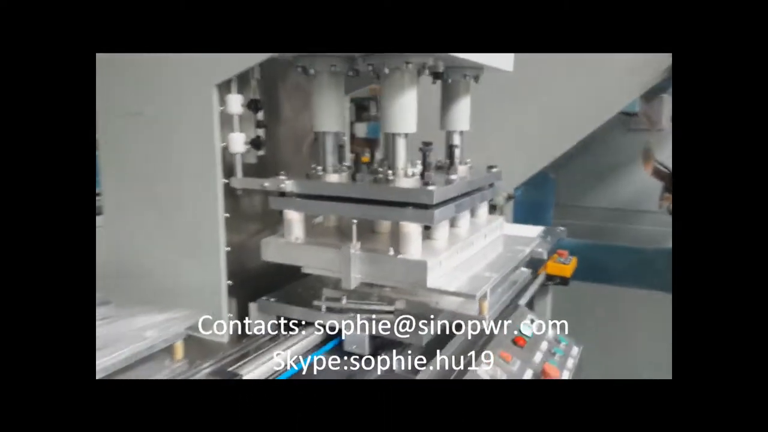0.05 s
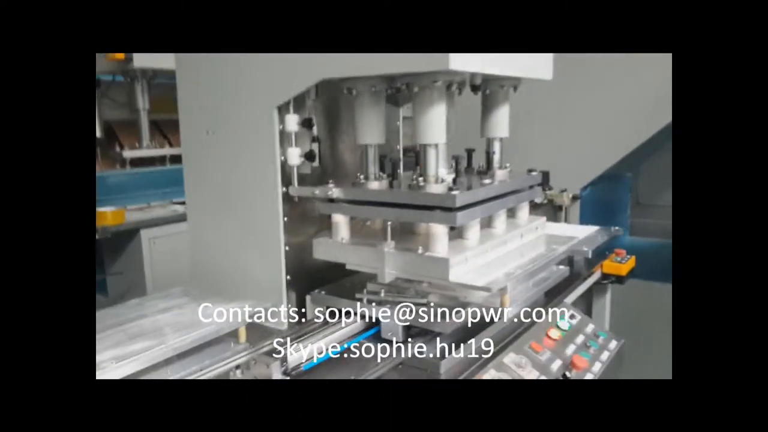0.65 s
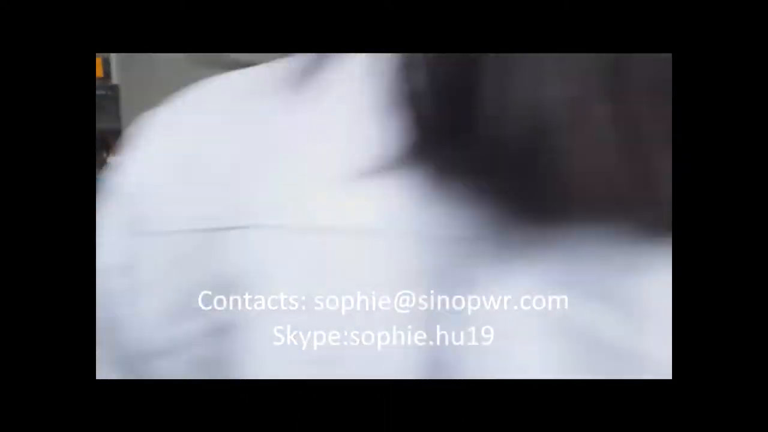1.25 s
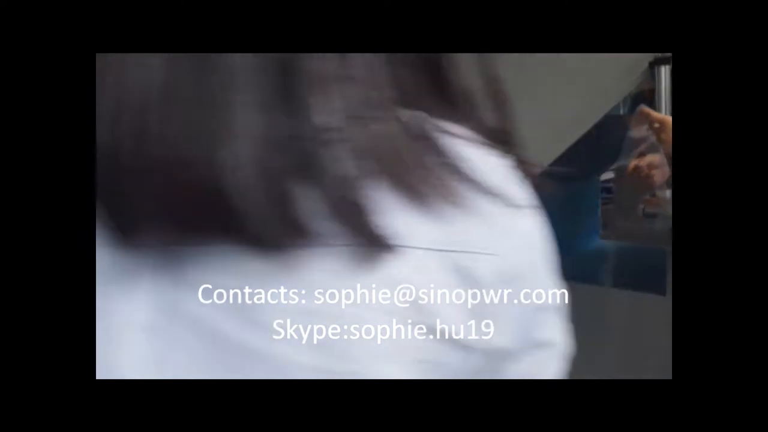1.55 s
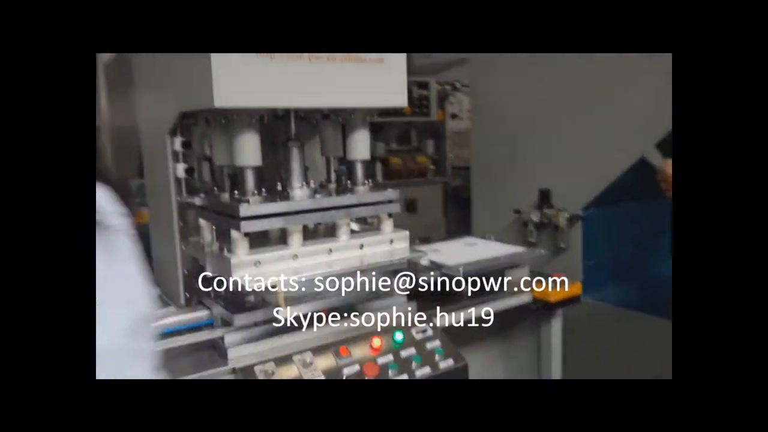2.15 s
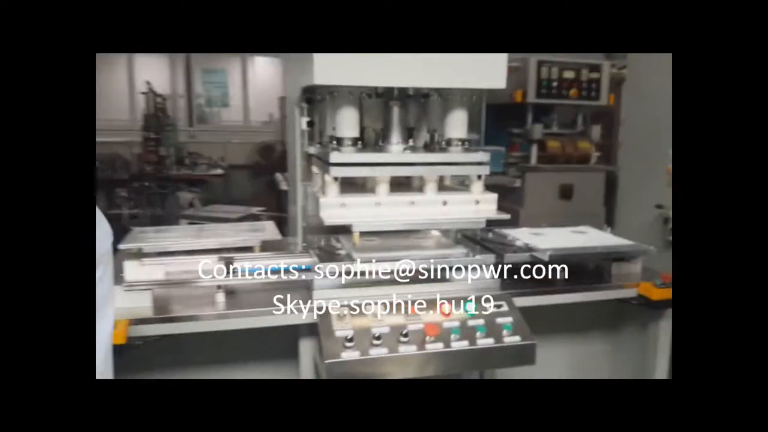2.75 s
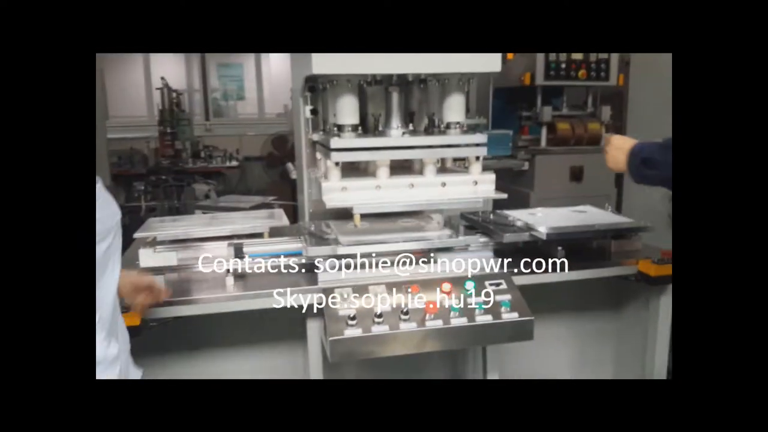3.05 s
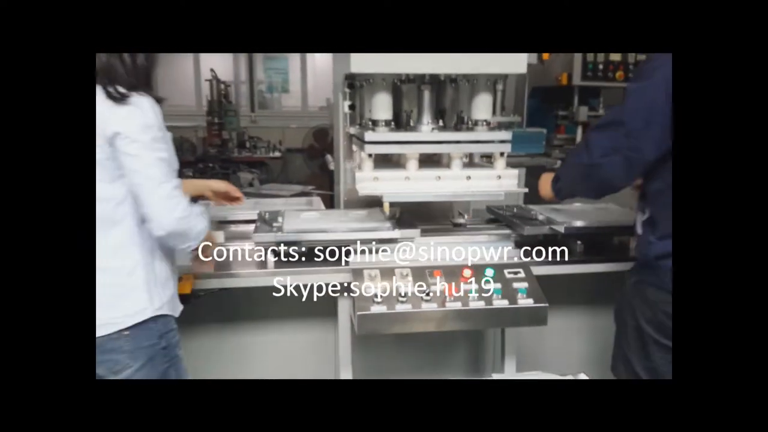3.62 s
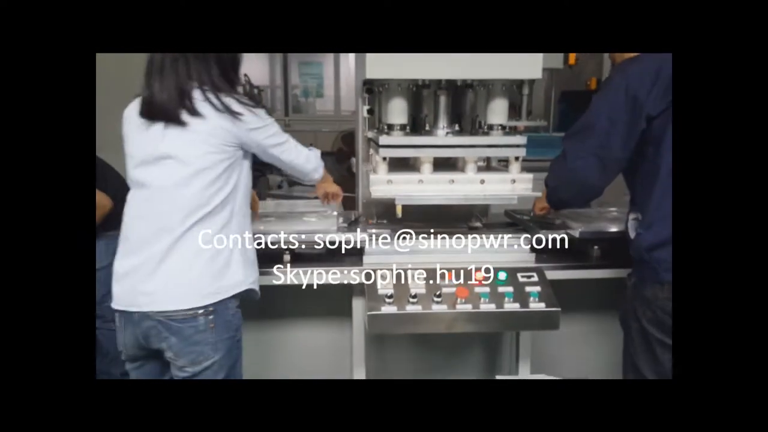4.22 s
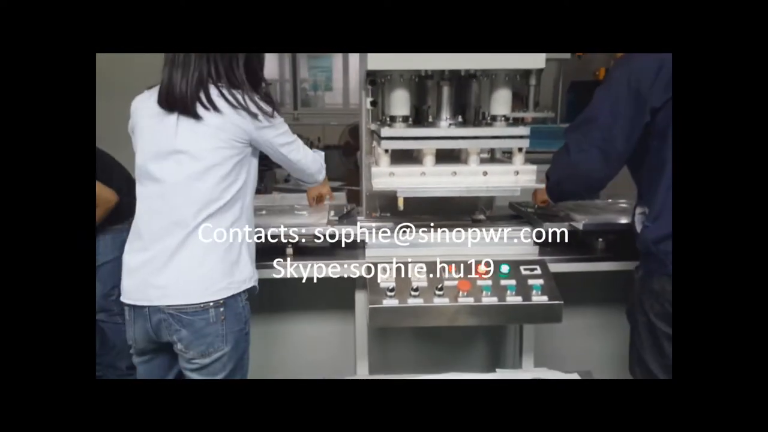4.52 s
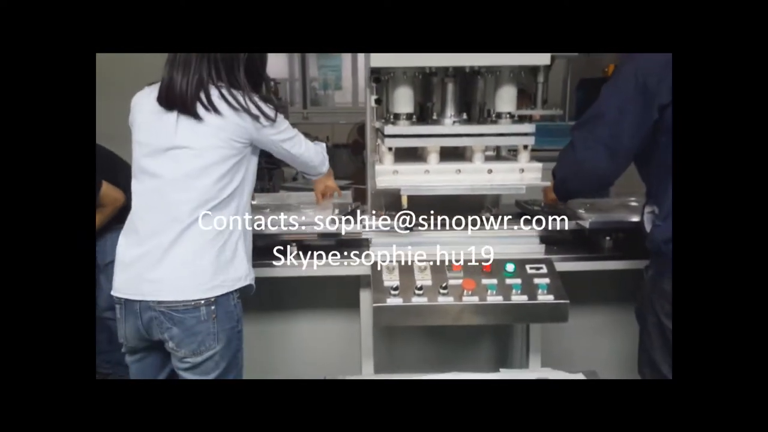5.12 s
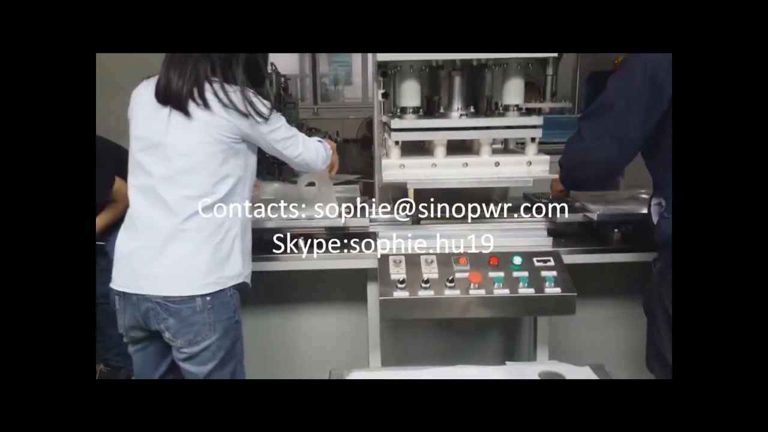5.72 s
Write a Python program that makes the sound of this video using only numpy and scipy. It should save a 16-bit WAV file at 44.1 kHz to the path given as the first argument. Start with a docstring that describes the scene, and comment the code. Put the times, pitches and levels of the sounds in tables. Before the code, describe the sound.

In an echoing workshop, compressed air blows with a loud, sharp hiss, broken by breathy whistles, quick spurts and a few soft bumps on the microphone. The jet stops suddenly about two thirds of the way through. What follows is much quieter: light metal knocks, a ringing clank, and the pump of a press starting to hum and whine, with seeping air and other machines droning underneath.

```python
"""Compressed air at a sealing press

An air jet hisses in a large workshop, whistling on metal edges and roaring on flat surfaces,
while a few puffs bump the microphone. The air shuts off and the hall rings out. A metal part
clanks, then the press's pump starts to churn and whine. A small leak and the drone of other
machines run underneath throughout."""
import sys
import numpy as np
from scipy import signal
from scipy.fft import rfft, irfft, next_fast_len
from scipy.io import wavfile
from scipy.ndimage import uniform_filter1d

SR = 44100
rng = np.random.default_rng(int(sys.argv[2]) if len(sys.argv) > 2 else 0)


def store_wav(level_fs):
    """Save 16-bit WAV to argv[1]."""
    pcm = np.round(np.clip(np.atleast_2d(level_fs), -1, 1) * 32767)
    wavfile.write(sys.argv[1], SR, pcm.T.astype(np.int16))


N = 254898
TIME = np.arange(N) / SR
FRAME_S = np.arange(N // 128 + 3)[:, None] * 128 / SR  # time and frequency grid of the turbulence
BIN_HZ = np.fft.rfftfreq(512, 1 / SR)
FIZZ_BAND = np.clip((BIN_HZ - 9000) / 3000, 0, 1)


def jet(trim_db=-6.5, flutter_db=0.83, sputter_db=0.9):
    """Broad turbulent hiss that flutters, surges and brightens as the jet moves."""
    # flow of the moving jet: t/s, strength/dB, fizz/dB
    flow = [(0.0, -20.5, -1.5), (0.95, -20, -2), (1.3, -27.5, 1), (1.38, -20.5, -1.5), (1.62, -22.5, -5),
            (1.95, -21, -1), (2.1, -21.5, -3), (2.36, -22, -2.5), (2.7, -21, 1.5), (3.55, -22, -1.5),
            (3.75, -19.5, -1), (3.88, -24.5, -6), (3.98, -26, 2.5)]
    # spectrum of the hiss: f/Hz, level/dB
    spectrum = [(60, -41), (200, -15), (500, -13.5), (1000, -8.5), (2000, -5.5), (4000, -1), (8000, 0),
                (12000, 2.5), (16000, -0.5)]
    # quick surges: middle t/s, length/s, gain/dB, extra fizz/dB
    surges = [(2.042, .03, 2.5, -6), (2.15, .045, 4.5, 2), (2.28, 0.034, 3, 5), (2.464, 0.054, 3, 4.5),
              (2.608, .016, 5.5, 2), (2.7, 0.1, 3.5, -6), (2.78, 0.031, 0, -3), (2.845, 0.029, 6, -10),
              (2.892, .026, 4.5, -1), (3.073, 0.052, 2, 0), (3.148, .03, 4, -3), (3.285, 0.038, 5.5, 4),
              (3.41, 0.025, 3.5, 7), (3.466, 0.047, 4.5, -1), (3.594, .045, 0.5, 6),
              (3.728, 0.054, 3.5, -5)]
    strength_db, _ = follow(flow, TIME)
    fizz_db = follow(flow, FRAME_S)[1] + sputter_db * np.interp(FRAME_S, TIME, wander(20))
    for s, length, gain_db, extra_db in surges:
        strength_db += gain_db * bump(s, length, TIME)
        fizz_db += extra_db * bump(s, length, FRAME_S)
    hiss = turbulence(read(spectrum, BIN_HZ) + FIZZ_BAND * fizz_db, patchy_db=1.07)
    return hiss * amp(trim_db + strength_db + flutter_db * wander(30)) * valve()


def roar(start_s=1.021, trim_db=-0.5, flutter_db=0.63, usual_db=-31):
    """The jet lands on a surface with a rough rush, weaker and brighter as it glances off."""
    # how squarely the jet strikes: t/s, level/dB
    strike = [(1.04, -28.5), (1.12, -24.5), (1.25, -31), (1.4, -32.5), (1.6, -30), (1.9, -29.5),
              (2.08, -28), (2.16, -34.5), (2.55, -36.5), (2.65, -30.5), (3.0, -33), (3.6, -43), (3.85, -33),
              (3.97, -34)]
    # spectrum of air on a flat surface: f/Hz, level/dB
    spectrum = [(100, -35.5), (400, -18.5), (650, -10.5), (950, -5.5), (1500, -0.5), (2300, 0),
                (3200, -0.5), (5000, -5.5), (8000, -13), (16000, -51)]
    roar_db, = follow(strike, TIME)
    treble_db = 0.68 * (usual_db - follow(strike, FRAME_S)[0])
    treble_band = np.clip((BIN_HZ - 2000) / 2000, 0, 1)
    rush = turbulence(read(spectrum, BIN_HZ) + treble_band * treble_db, patchy_db=2.5)
    return rush * amp(trim_db + roar_db + flutter_db * wander(30)) * ramp(start_s, 0.026) * valve()


def valve(shut_s=3.985):
    """The air supply shuts in one quick fade."""
    return 1 - ramp(shut_s, 0.057)


def whistle(level_db, hz, first_width, settled_width, off_s, fade_db_per_s, settle_s=0.42):
    """A breathy whistle that settles to a steady width and fades as the jet moves off."""
    width = np.interp(FRAME_S, [0, settle_s], [first_width, settled_width])
    fade_db = fade_db_per_s * np.maximum(TIME - off_s, 0)
    breath = turbulence(resonance_db(hz, width, BIN_HZ), patchy_db=1.5)
    return breath * amp(level_db - fade_db + 1.5 * wander(11))


def squeals():
    """Short whistles and hollow spurts as the jet crosses edges and holes."""
    # crossings: middle t/s, length/s, level/dB, centre f/Hz, width/Hz
    crossings = [(.01, 0.069, -24.5, 10600, 1000), (0.024, 0.11, -30, 3400, 700),
                 (0.207, 0.18, -29.5, 3300, 910), (0.293, 0.086, -40.5, 1610, 1200),
                 (.39, 0.043, -27.5, 10300, 600), (0.633, 0.25, -35.5, 3230, 90),
                 (0.787, 0.19, -27.5, 10270, 700), (0.835, .11, -29, 3200, 130),
                 (1.32, 0.046, -31.5, 2160, 1000), (1.6, 0.61, -38.5, 990, 400),
                 (1.61, 0.64, -52.5, 256, 200), (1.643, 0.031, -29.5, 3360, 800),
                 (1.814, 0.063, -27, 1930, 900), (1.839, 0.05, -27.5, 2363, 150),
                 (1.95, 0.26, -28, 3880, 1900), (2.128, 0.024, -23, 11200, 450),
                 (2.168, .03, -28, 11000, 300), (2.169, 0.019, -27, 3780, 1300),
                 (2.27, 0.23, -33.5, 3520, 1200), (2.268, .025, -23, 11000, 1300),
                 (2.321, 0.015, -22, 10700, 1000), (2.434, .02, -27, 3700, 1200),
                 (2.558, 0.018, -27.5, 3520, 700), (2.93, 0.32, -38.5, 1900, 1000),
                 (3.273, 0.033, -28.5, 9900, 400), (3.316, 0.027, -29.5, 3400, 400),
                 (3.402, .035, -28, 10900, 300), (3.593, 0.026, -19.5, 11060, 130),
                 (3.942, .052, -33.5, 3300, 900)]
    out, axis_hz = np.zeros(N), np.arange(0, SR / 2, 10)
    for s, length, db, hz, width in crossings:
        band = np.column_stack([axis_hz, resonance_db(hz, width, axis_hz)])
        swell = bump(s, length, TIME)
        squeal = unit(swell * colour(rng.standard_normal(N), band))
        out += amp(db) * squeal * np.sqrt(np.mean(swell ** 2))
    return out


def puffs():
    """Each puff bumps the microphone with one push and pull of pressure."""
    # puffs of air: t/s, peak/dB, swell/s
    gusts = [(2.406, -36, 0.00059), (2.8923, -31, 0.0012), (3.275, -33, .0008), (3.412, -43, .0011),
             (3.72, -27, 0.00073)]
    out = np.zeros(N)
    for s, db, swell in gusts:
        offset = (TIME - s) / swell
        out -= amp(db) * 3 * offset / (1 + offset ** 2) ** 2
    return out


def knocks():
    """The mechanism knocks: a burst of clatter and the ring of a steel part."""
    # hits: t/s, clatter level/dB, clatter t60/s, clatter centre f/Hz, ring level/dB
    hits = [(4.574, -47, 0.18, 1800, -45.5), (4.627, -59, 0.12, 2000, -51.5), (5.134, -42, 0.32, 834, -48),
            (5.137, -50, 0.18, 3000, -62)]
    # modes of the steel part: f/Hz, level/dB, t60/s
    modes = [(637, -4, 0.92), (661, -2, 0.25), (1314, -15, 0.43), (1782, -19, .3)]
    out = np.zeros(N)
    for s, db, t60, centre_hz, ring_db in hits:
        age = np.maximum(TIME - s, 0)
        spectrum = [(centre_hz / 6, -12), (centre_hz, 0), (centre_hz * 2.1, -9), (centre_hz * 8, -28)]
        clatter = amp(db - 60 * age / t60) * noise(spectrum)
        ring = sum(amp(level - 60 * age / decay) * np.sin(2 * np.pi * hz * age)
                   for hz, level, decay in modes)
        out += ramp(s, 0.0036) * (clatter + amp(ring_db) * ring)
    return out


def pump(start_s=5.135, churn_db=-46.5):
    """Churning oil, a wavering hum and a whine that climbs with the load."""
    # spectrum of the churning oil: f/Hz, level/dB
    oil = [(29, -46), (50, -11), (294, 0.5), (410, -5), (471, -13), (509, -15), (551, -8), (1310, -14.5),
           (1420, -11), (1530, -15), (2410, -23), (2760, -17), (5500, -21.5), (7150, -53), (12100, -120)]
    # partials of the hum: f/Hz, level/dB
    partials = [(95, -63.5), (247.6, -59), (305, -54.5), (473.7, -54.5), (631, -69), (952.8, -64),
                (1130, -71), (1631, -74), (1916, -61), (2730, -66)]
    # whine of the vanes: t/s, level/dB, f/Hz
    vanes = [(5.14, -75, 1400), (5.3, -57, 1403), (5.38, -56, 1425), (5.56, -62, 1396), (5.68, -50, 1437),
             (5.78, -53, 1445)]
    churn = amp(churn_db + 0.42 * wander(23)) * noise(oil)
    hum = sum(amp(db) * tone(hz, waver_hz=3) for hz, db in partials)
    whine_db, whine_hz = follow(vanes, TIME)
    whine = amp(whine_db) * tone(whine_hz, waver_hz=11.7)
    return churn * ramp(start_s, 0.086) + hum * ramp(start_s, 0.22) + whine * ramp(start_s, 0.05)


def leak(flutter_db=0.9, fizz_db=-1.5):
    """Air keeps seeping from the press, more strongly as the pressure builds."""
    # seepage, following the line pressure: t/s, level/dB
    seepage = [(4.1, -48), (4.6, -51), (4.8, -54.5), (5.02, -50.5), (5.22, -42), (5.6, -41), (5.78, -42)]
    # spectrum of the leak: f/Hz, level/dB
    spectrum = [(60, -20), (500, 4), (2000, -1), (4500, -4), (8000, -0.5), (12000, 1), (16000, 3)]
    leak_db, = follow(seepage, TIME)
    seep = turbulence(read(spectrum, BIN_HZ) + FIZZ_BAND * fizz_db, patchy_db=0.5)
    return seep * amp(leak_db + flutter_db * wander(5.1))


def shop(level_db=-55.5):
    """The steady drone of other machines."""
    # spectrum of the drone: f/Hz, level/dB
    drone = [(18, -64), (30, -56), (86, -10.5), (146, -6.5), (309, -2.5), (344, -4.5), (475, -8.5),
             (506, -9.5), (640, -13.5), (760, -14), (5000, -35.5), (6500, -64), (11000, -120)]
    return amp(level_db) * noise(drone)


def hall(x, count=3):
    """A diffuse hall echo, gently shifting as it crossfades between several tails."""
    sends = [np.sqrt(2 / count) * np.cos(2 * np.pi * TIME + np.pi * k / count) for k in range(count)]
    return sum(signal.fftconvolve(x * send, tail())[:N] for send in sends)


def tail(length_s=1.5, predelay_s=0.008):
    """A diffuse room response whose treble dies first."""
    # decay of the hall: f/Hz, t60/s
    decay = [(200, 1.2), (1200, 1.74), (3200, 1.44), (5500, 1.4), (8300, 0.81), (12000, 0.5), (16000, 0.43)]
    hz, t, wash = signal.stft(rng.standard_normal(int(length_s * SR)), SR, nperseg=256)
    t60 = read(decay, hz)[:, None]
    response = signal.istft(wash * amp(-60 * t / t60) / np.sqrt(t60) * (t > predelay_s), SR)[1]
    return response / np.linalg.norm(response)


def turbulence(shape_db, patchy_db):
    """Noise of unit power with a moving spectrum, broken into patches by eddies."""
    real, imag, eddies = rng.standard_normal((3, len(FRAME_S), len(BIN_HZ)))
    eddies = unit(uniform_filter1d(uniform_filter1d(eddies, size=12, axis=0), size=12, axis=1))
    frames = (real + 1j * imag) * amp(shape_db + patchy_db * eddies)
    return unit(signal.istft(frames.T, nperseg=512, noverlap=384)[1][:N])


def resonance_db(hz, width, axis_hz):
    """A steep-sided resonance whose power does not depend on its width."""
    detuning = (axis_hz ** 2 - hz ** 2) / (2 * axis_hz + 1)
    return -20 * np.log10(1 + (detuning / (0.92 * width)) ** 2) - 10 * np.log10(width)


def tone(hz, waver_hz):
    """A sine of unit power with unsteady pitch."""
    return np.sqrt(2) * np.sin(2 * np.pi * np.cumsum(hz + waver_hz * wander(31.8)) / SR)


def noise(spectrum):
    """Steady coloured noise of unit power."""
    return unit(colour(rng.standard_normal(N), spectrum))


def colour(x, spectrum):
    """Filters x by a spectrum table."""
    size = next_fast_len(N, True)
    return irfft(rfft(x, size) * amp(read(spectrum, np.fft.rfftfreq(size, 1 / SR))), size)[:N]


def wander(rate_hz):
    """Slow random drift of unit power."""
    size = next_fast_len(N, True)
    hz = np.fft.rfftfreq(size, 1 / SR)
    return unit(irfft(rfft(rng.standard_normal(size)) / (1 + (hz / rate_hz) ** 2), size)[:N])


def ramp(start, length):
    """A fade-in from 0 to 1."""
    return np.clip((TIME - start) / length, 0, 1)


def bump(middle, length, t):
    """A smooth swell of height 1 over the times t."""
    return np.exp(-(2 * (t - middle) / length) ** 2)


def read(points, hz):
    """A table's values at hz, on a log-frequency axis."""
    f, value = np.transpose(points)
    return np.interp(np.log(hz + 1), np.log(f + 1), value)


def follow(rows, t):
    """Every curve of an envelope table at the times t."""
    s, *columns = np.transpose(rows)
    return [np.interp(t, s, c) for c in columns]


def amp(db):
    """Decibels to amplitude."""
    return 10 ** (np.asarray(db) / 20)


def unit(x):
    """Scales x to unit power."""
    return x / np.sqrt(np.mean(x ** 2) + 1e-20)


def scene():
    """Air and clanks feed the hall; puffs, leak, pump and drone stay dry."""
    # whistles in a gap and on an edge:
    # level/dB, f/Hz, first width/Hz, settled width/Hz, fade start t/s, fade/(dB/s)
    whistles = [(-34, 3300, 850, 570, 0.91, 42), (-32.5, 10370, 480, 530, 1.08, 113)]
    gap, edge = (whistle(*row) for row in whistles)
    hiss = jet() + squeals() + edge
    body = roar() + gap
    clanks = knocks()
    echo = hall(amp(-3.5) * hiss + amp(-2.0) * (body + clanks))
    mono = hiss + body + clanks + echo + puffs() + leak() + pump() + shop()
    return np.array([mono, mono])


def record(dry, cutoff_hz=15800):
    """One microphone whose port rings near 8 kHz, then a steep low-pass."""
    # response of the port: f/Hz, gain/dB
    port = [(4600, 0), (5900, -3.5), (6900, 3), (7400, 8.5), (7900, 15), (8330, 17.5), (8850, 11.5),
            (9500, 7), (10600, 1.5), (11700, -0.5), (15500, -6.5)]
    heard = np.array([colour(channel, port) for channel in dry])
    lowpass = signal.firwin(511, cutoff_hz, window=("kaiser", 9), fs=SR)
    return signal.oaconvolve(heard, lowpass[None], "same")


dry = scene()
out = record(dry)
store_wav(out)
```